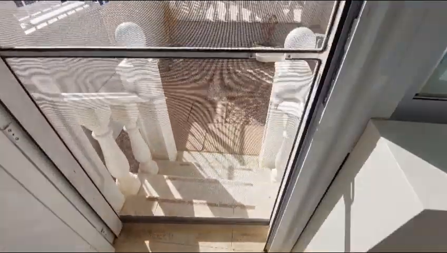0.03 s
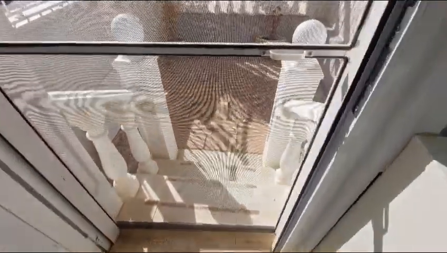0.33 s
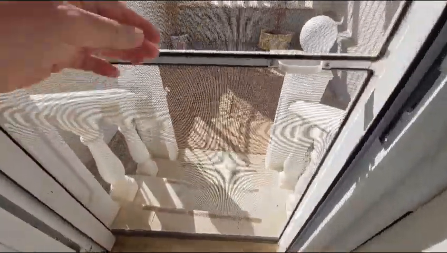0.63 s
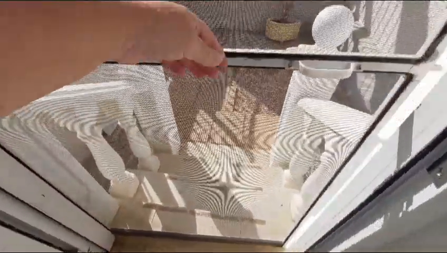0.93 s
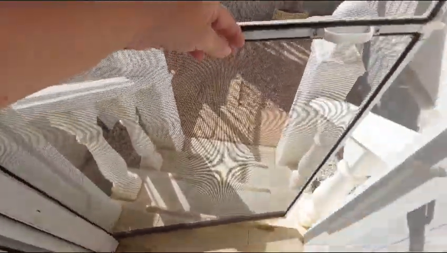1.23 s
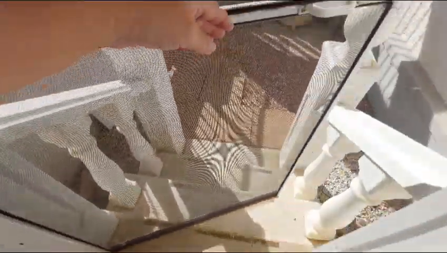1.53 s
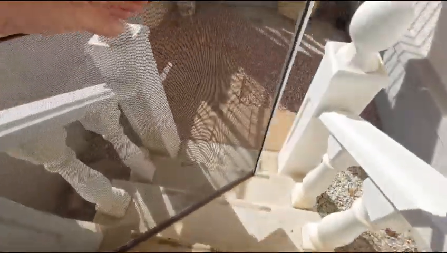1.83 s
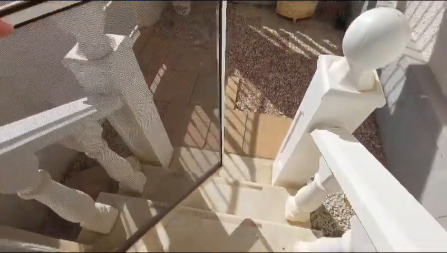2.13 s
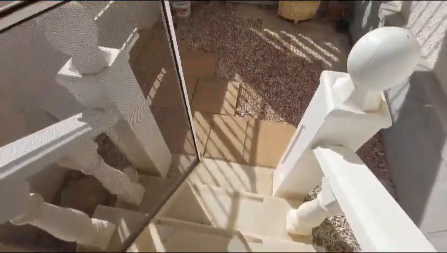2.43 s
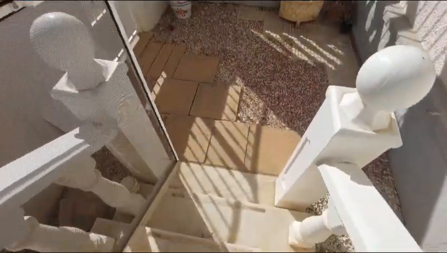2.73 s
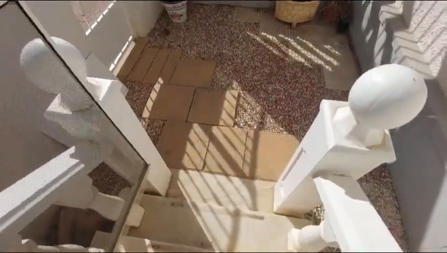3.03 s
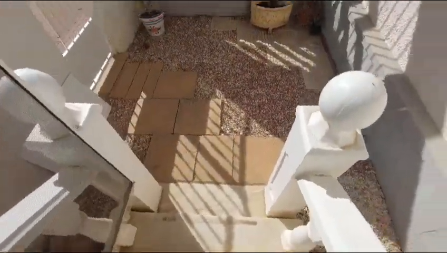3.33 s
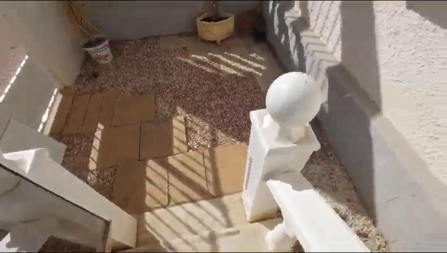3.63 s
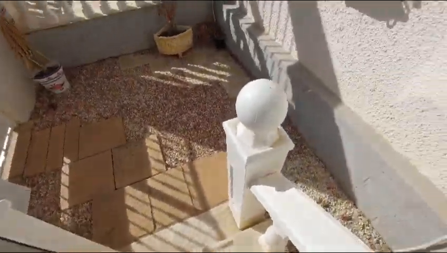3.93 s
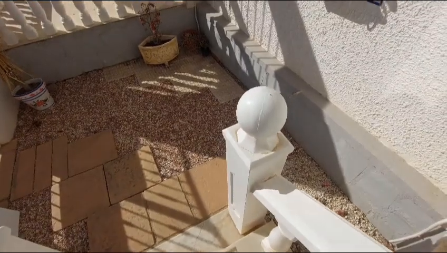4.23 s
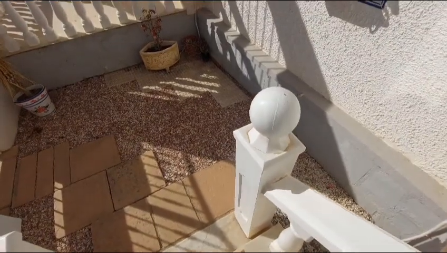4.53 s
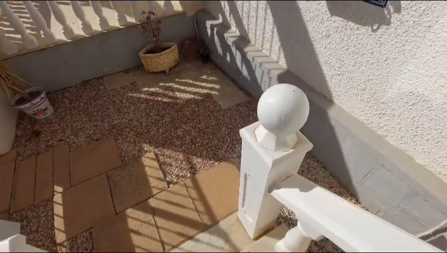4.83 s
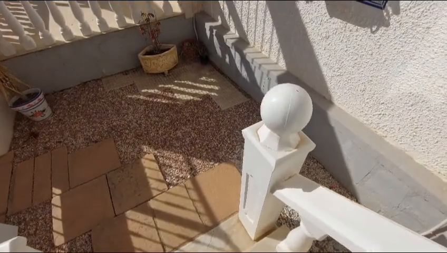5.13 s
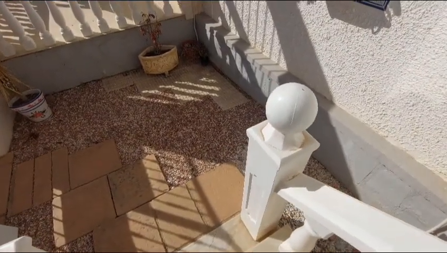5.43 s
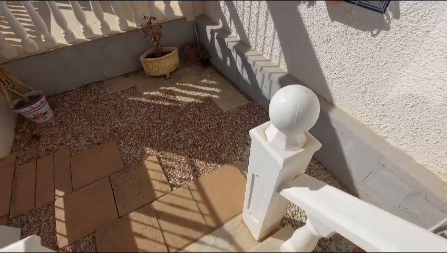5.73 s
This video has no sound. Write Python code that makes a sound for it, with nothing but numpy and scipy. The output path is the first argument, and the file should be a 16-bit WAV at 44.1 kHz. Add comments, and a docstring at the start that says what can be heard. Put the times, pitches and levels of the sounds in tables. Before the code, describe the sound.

A metal screen door rattles open, squeaks and bangs against its stop, followed by heavy footsteps on outdoor steps.

```python
"""A metal screen door is pushed out of its frame, squeaks open and bangs against its stop.
Each blow makes the door rattle and ring, and a hallway echoes it; the hinge squeaks as it grips and slips.
Gusts buffet the microphones in the doorway, a hand slides on the door and clothes brush.
Then heavy footfalls boom on the steps between hard walls.
The hush of the house fades into a quiet yard with far birds."""
import sys
import numpy as np
from scipy import signal
from scipy.fft import rfft, irfft
from scipy.io import wavfile
from scipy.ndimage import uniform_filter1d

SR = 44100
rng = np.random.default_rng(int(sys.argv[2]) if len(sys.argv) > 2 else 0)


def dump(signal):
    """Clip the signal to [-1, 1] and save it as 16-bit WAV at the path in sys.argv[1]."""
    limited = np.clip(np.atleast_2d(signal).T, -1, 1)
    pcm = np.round(limited * 32767).astype(np.int16)
    wavfile.write(sys.argv[1], SR, pcm)


N = 264600
TIME = np.arange(N) / SR
TOP_HZ = 16000

# A colour says how strong a sound is from bass to treble. For each: f/Hz, level/dB
HOUSE_COLOUR = [(24, -36.5), (40, -10), (60, -12), (200, -6.5), (300, -1), (455, -2.5), (600, 4),
                (1270, 3.5), (2000, -0.5), (3300, -11.5), (4930, -5), (9000, -19.5), (16000, -22.5)]
YARD_COLOUR = [(15, -35), (25, -17), (59, 2.5), (123, -2.5), (180, -10.5), (242, -9.5), (373, -20),
               (607, -16.5), (936, -28.5), (2910, -31.5), (4200, -25.5), (6000, -33.5), (16000, -41.5)]
WIND_COLOUR = [(20, -35.5), (45, -4), (75, 3), (110, -2), (170, -15.5), (260, -22.5), (400, -34.5),
               (1000, -51), (8000, -54)]
BUFFET_COLOUR = [(50, -32), (110, -4.5), (170, -0.5), (260, -11), (450, -34), (1500, -70), (8000, -80)]
RUB_COLOUR = [(530, -43), (900, -23.5), (1600, -13), (1850, -4), (2700, -4.5), (4300, -6), (5500, -14),
              (8250, -6.5), (11600, -7), (16000, -7.5)]
JUDDER_COLOUR = [(35, -51), (60, -16), (176, -14.5), (301, -7), (360, -11.5), (570, -14.5), (1090, -14),
                 (1620, -14), (2900, -17.5), (3760, -24.5), (7000, -27.5), (11000, -38.5), (16000, -41)]
KNOCK_COLOUR = [(100, -23.5), (250, 9), (500, -0.5), (750, -12), (1300, -16), (2200, -34.5), (8000, -43.5),
                (16000, -53)]
BANG_COLOUR = [(29, -50.5), (65, -26), (114, -7), (160, -12.5), (277, -5), (389, -13), (661, -14),
               (927, -15), (1120, -11.5), (2010, -13.5), (3000, -13.5), (5400, -20.5), (7200, -19.5),
               (10500, -26.5), (16000, -33.5)]
CLOTHES_COLOUR = [(200, 5.5), (600, 5), (1200, -0.5), (2300, 5.5), (3300, 0.5), (5000, -0.5), (6500, -11),
                  (9000, -12), (16000, -22)]
STEP_COLOUR = [(29, -51), (50, -31.5), (114, 0), (260, -3.5), (398, -13), (900, -17), (1100, -21),
               (2200, -29), (3300, -34.5), (5500, -48.5), (7500, -53.5), (10500, -57.5), (16000, -61)]
MIC_COLOUR = [(7500, -0.5), (9700, -4.5), (11500, 1), (13500, 3.5), (15500, 0), (16200, 2.5)]  # a dip in the treble, then a lift from the microphones' openings

# gusts on the microphones: t/s, length/s, level/dB, left minus right/dB
GUSTS = [(-.02, 0.039, -42.5, 1), (0.042, 0.033, -50.5, 19), (1.317, 0.099, -38, -28),
         (1.434, 0.063, -32, -22), (1.558, 0.023, -38, -31), (1.624, 0.064, -35.5, -7),
         (1.737, 0.068, -37, -10), (1.861, 0.22, -45.5, -9), (2.068, 0.057, -48.5, -6),
         (2.583, 0.31, -49, -17), (3.029, 0.081, -52.5, -11)]
# rubbing movements: t/s, length/s, level/dB
HAND_SLIDES = [(.23, 0.18, -59.5), (.515, 0.022, -51.5), (.66, 0.1, -61), (1.215, 0.029, -49.5),
               (1.96, 0.032, -55.5), (2.11, .06, -64.5), (2.25, 0.32, -75.5)]
CLOTHES_BRUSHES = [(3.55, 0.11, -63), (3.715, .035, -57), (3.79, 0.023, -56.5), (3.89, 0.18, -59.5),
                   (4.33, .03, -77.5), (4.5, 0.085, -71), (4.628, .035, -67), (5.36, 0.052, -75),
                   (5.96, .04, -62.5)]
# clicks of fittings and heels: t/s, starting level/dB, centre f/Hz, width/octaves, time to fade 60 dB/s
TICKS = [(0.541, -47.5, 6130, 2.1, 0.18), (1.251, -47, 9000, 1.4, .03), (1.34, -40.5, 10700, 0.13, .012),
         (2.683, -53, 8100, 0.71, 0.019), (3.225, -17, 12000, 3.7, .005),
         (3.582, -24.5, 5240, 0.88, 0.0071), (3.585, -44.5, 7740, 0.9, 0.088),
         (3.355, -54, 13000, 0.46, .07), (3.408, -51, 13000, 0.77, .07), (4.806, -50.5, 14100, 0.69, 0.083),
         (4.895, -52, 12000, 1.3, 0.089), (5.606, -54, 12950, 1.4, .06)]
# far bird calls: t/s, length/s, start f/Hz, end f/Hz, level/dB
BIRD_CALLS = [(0.833, 0.15, 5900, 6200, -60), (0.939, 0.091, 4700, 4300, -56),
              (1.166, 0.21, 5780, 5830, -52), (1.214, 0.073, 4490, 4890, -47.5),
              (1.311, 0.14, 3890, 4570, -51), (1.902, .22, 5480, 4820, -61),
              (2.372, .12, 4270, 3640, -67.5), (2.652, 0.171, 3580, 3710, -70.5),
              (2.799, .32, 4230, 3990, -70.5), (3.999, 0.27, 617, 583, -70),
              (5.962, 0.053, 4460, 6620, -61.5)]
# slips of frame and hinge: t/s, length/s, level/dB, start f/Hz, share of tone (0-1), overtone boost/dB
SQUEAKS = [(1.044, .052, -36.5, 2864, .98, -15.5), (1.39, 0.062, -43, 1885, 0.2, -1),
           (1.44, 0.062, -43, 2340, .3, -2), (1.498, 0.02, -45.5, 2850, 0.7, 0),
           (1.668, 0.052, -43.5, 1820, 0.7, -8.5), (1.713, 0.06, -41.5, 2426, 0.74, -4),
           (1.762, 0.041, -41, 2754, 0.9, 3.5), (1.795, 0.036, -42.5, 2960, 0.84, -0.5)]

# blows: t/s, level/dB, brightness/(dB per octave), swell time/s, ringing/dB, spot struck (0-1)
JUDDERS = [(1.053, -22.5, -1.5, 0.015, -1.5, 0.18), (1.077, -25.5, -1, 0.0024, 4, 0),
           (1.090, -21, -1, .002, -5.5, 0.14), (1.102, -19.5, 0.57, .004, 3.5, 0.01)]  # the door drags out of its frame
KNOCKS = [(2.376, -45.5, 1.5, 0.0044, -26.5, 0.23), (2.412, -47.5, 2.5, 0.00036, -22.5, 0.1),
          (2.452, -57.5, 4, 0.0032, -5.5, 0.3)]  # light knocks underfoot
BANGS = [(3.226, -27, 0.4, 0.0012, 2, 0.8), (3.231, -16, 0, 0.0024, -2.5, 1),
         (3.245, -20.5, -3.5, 0.0017, 4, 0.7), (3.357, -22.5, -8, 0.0037, -17, 0.8),
         (3.392, -28.5, -5, 0.0018, -15, 0.1), (3.406, -57, 6, 0.0024, -16.5, 0.8),
         (3.505, -42, -2, 0.0056, -17, 1)]  # the door hits its stop and bounces
STEPS = [(4.805, -29, 3, 0.03, 0.5, 0.69), (4.894, -27.5, 1.4, 0.014, 0, 0.75),
         (4.983, -34, 0.3, 0.0008, -6.5, 0), (5.105, -38, -24, 0.016, -28, 0.8),
         (5.607, -27.5, 2.5, 0.02, -4.5, 0.99)]  # heel and sole land
# the notes a struck thing rings with: f/Hz, time to fade 60 dB/s, level at spot 0/dB, at spot 1/dB
DOOR_NOTES = [(119, 1, -33.5, -25), (286, 0.75, -17.5, -20.5), (313.8, 0.67, -16.5, -23.5),
              (417.5, 0.45, -11, -31.5), (559, 0.74, -37, -23.5), (588, 0.25, -6.5, -29),
              (666.4, 0.51, -15, -32.5), (770, 0.48, -12, -22), (857, 0.59, -17, -23.5),
              (915, 0.14, -19.5, -4), (1004, 0.18, -16.5, -23.5), (1189, .25, -11, -29.5),
              (1300, .25, -17, -28), (1948, .65, -18, -21), (2620, 0.4, -27.5, -23), (2530, 0.15, -37, -20),
              (2841, 0.16, -29.5, -19.5), (2980, .15, -31.5, -20), (3795, 0.32, -36, -26.5),
              (4334, 0.29, -44, -23.5), (6700, .14, -34, -20), (7246, 0.15, -36.5, -25.5)]  # spot 0 is the door's edge, spot 1 is where it meets the stop
STEP_NOTES = [(138.4, 0.94, -19, -18), (160, 0.19, -10, -24), (227, 0.52, -8, -32), (278.3, 0.48, 0.5, -11),
              (287, 0.98, -11.5, -26), (726, 0.633, -48, -14.5), (803, 0.31, -24.5, -7),
              (924, 0.16, -2.5, -8.5), (1277, 0.2, -14.5, -15.5), (1570, 0.077, -9.5, -3.5),
              (2220, 0.11, -23.5, -3.5), (2460, 0.071, -67, -2)]  # spot 0 is the upper step, spot 1 the lower
# how long door, steps and walls keep sounding: f/Hz, time to fade 60 dB/s
JUDDER_DECAY = [(100, 1), (300, 0.67), (800, 0.53), (2000, 0.21), (6000, 0.18), (14000, 0.11)]
HALL_DECAY = [(150, 1), (1000, 0.32), (4000, 0.82), (14000, 0.29)]
KNOCK_DECAY = [(200, 0.11), (1500, 0.089), (8000, 0.45)]
BANG_DECAY = [(100, 1), (300, 0.55), (800, 0.48), (2000, 0.29), (6000, 0.18), (14000, 0.22)]
STEP_DECAY = [(100, 0.93), (300, 0.52), (800, 0.32), (2000, 0.24), (6000, 0.19), (14000, 0.19)]
# how alike the two microphones hear sound from all around: f/Hz, likeness (1 = the same)
LIKENESS = [(40, 0.69), (120, 0.41), (290, .78), (500, 0.43), (800, -.1), (1300, -0.15), (2400, -0.13),
            (5000, -0.094), (15000, 1)]


def amp(db):
    """Turns decibels into a gain."""
    return 10 ** (np.asarray(db) / 20)


def unit(x):
    """Scales a signal to an average strength (rms) of 1."""
    return x / np.sqrt(np.mean(x ** 2) + 1e-20)


def read(points, hz):
    """Looks up a frequency in a table, blending between rows on a pitch scale."""
    f, value = np.transpose(points)
    return np.interp(np.log(hz + 1), np.log(f + 1), value)


def add(mix, s, sound):
    """Mixes a stereo sound in at s seconds."""
    part = mix[:, max(round(s * SR), 0):][:, :sound.shape[1]]
    part += sound[:, :part.shape[1]]


def noise(colour, size, tilt_db=0, all_around=True):
    """Coloured stereo noise: partly alike left and right if it comes from all around, else unrelated."""
    hz = np.fft.rfftfreq(size, 1 / SR)
    a, b = rng.standard_normal((2, len(hz))) + 1j * rng.standard_normal((2, len(hz)))
    alike = read(LIKENESS, hz) * all_around
    mid, side = a * np.sqrt(1 + alike), b * np.sqrt(1 - alike)
    octaves = np.log2((hz + 50) / 1000)
    gain = amp(read(colour, hz) + tilt_db * octaves)
    return unit(irfft(np.array([mid + side, mid - side]) * gain, size))


def wander(size, per_s):
    """A random curve of strength about 1 that turns per_s times a second."""
    points = rng.standard_normal(size)
    return np.interp(np.arange(size) * per_s / SR, np.arange(size), points) * np.sqrt(3 / 2)


def fuzzy(angle, blur_hz):
    """A stereo tone that flutters at random, which blurs its pitch."""
    size = len(angle)
    return np.array([wander(size, blur_hz) * np.cos(angle) + wander(size, blur_hz) * np.sin(angle)
                     for side in "LR"])


def stroke(s, length, rise_s, fall_db_per_s):
    """The gain of one movement: it swells, holds and dies away."""
    swell = np.sin(np.pi / 2 * np.clip((TIME - s) / rise_s, 0, 1)) ** 2
    return swell * amp(-fall_db_per_s * np.maximum(TIME - s - length, 0))


def strokes(rows, rise_s, fall_db_per_s):
    """The gain of a series of movements."""
    power = sum((amp(db) * stroke(s, length, rise_s, fall_db_per_s)) ** 2 for s, length, db in rows)
    return np.sqrt(power)


def die_away(x, decay, bass_lag_s=0.):
    """Fades each frequency at its own speed; the bass can build up late."""
    hz, t, bands = signal.stft(x, SR, nperseg=256)
    fade_s = read(decay, hz)[:, None]
    fade = amp(-60 * t / fade_s) * np.sqrt(fade_s.mean() / fade_s)  # shorter fades start louder
    lag_s = 1e-5 + bass_lag_s / (1 + (hz[:, None] / 400) ** 2)
    build_up = 1 - np.exp(-(t + 1e-3) / lag_s)
    return signal.istft(bands * fade * build_up, SR, nperseg=256)[1][:, :x.shape[1]]


def blows(rows, colour, decay, notes, rattle_db, bass_lag_s, ripple_db):
    """Each blow sets off a fading rattle and the clear notes of the thing struck."""
    out, t = np.zeros((2, N)), np.arange(SR) / SR
    # crowded high notes make the colour uneven, in the same way for every blow
    grid_hz = np.r_[np.geomspace(20, 1000, 60), np.arange(1070, 17000, 70)]
    treble = np.clip(grid_hz / 1000 - 1, 0, 1)
    ripple = ripple_db * np.clip(rng.standard_normal(len(grid_hz)), -2, 1) * treble
    colour = np.transpose([grid_hz, read(colour, grid_hz) + ripple])
    hz, fade_s, db_0, db_1 = np.transpose(notes)
    tones = np.exp(np.outer(2j * np.pi * hz - np.log(1000) / fade_s, t))
    # each note reaches the two microphones out of step
    apart = np.arccos(read(LIKENESS, hz)) * rng.choice([-1, 1], len(hz)) / 2
    pair = np.sqrt(2) * np.exp(1j * np.outer([1, -1], apart))
    for s, db, tilt_db, swell_s, ring_db, spot in rows:
        note_gains = amp(ring_db + db_0 + spot * (db_1 - db_0))
        ring = ((pair * note_gains) @ tones).imag
        rattle = die_away(noise(colour, SR, tilt_db), decay, bass_lag_s)
        rattle *= amp(rattle_db * wander(SR, 350))
        swell = 1 - np.exp(-t / swell_s)
        add(out, s, amp(db) * swell * (rattle + ring))
    return out


def house(doorway_s=1.996, crossing_s=0.14, drop_db=22, fade_db_per_s=7):
    """The indoor hush drops as the microphones pass the doorway, then fades with distance."""
    outside = 1 / (1 + np.exp((doorway_s - TIME) / crossing_s))
    distance_db = fade_db_per_s * np.maximum(TIME - doorway_s, 0)
    return amp(-52.5 - drop_db * outside - distance_db) * noise(HOUSE_COLOUR, N)


def yard():
    """A faint outdoor rumble that wavers a little."""
    return amp(-64 + 0.71 * wander(N, 9)) * noise(YARD_COLOUR, N)


def wind():
    """Swirls of air rumble on each microphone separately; strong gusts buffet at a higher pitch too."""
    power = np.zeros((2, N))
    swirls = noise(WIND_COLOUR, N, all_around=False)
    swirls /= np.sqrt(uniform_filter1d(swirls ** 2, 3000) + 1e-6)  # evens out their strength
    for s, length, db, pan_db in GUSTS:
        sides = amp([[pan_db / 2], [-pan_db / 2]])
        gust = amp(db) * stroke(s, length, rise_s=0.024, fall_db_per_s=229.5)
        power += (gust * 2 * sides / np.linalg.norm(sides)) ** 2
    buffet = amp(15.5) * power * noise(BUFFET_COLOUR, N, all_around=False)
    lumps = amp(2.5 * wander(N, 25))
    return (np.sqrt(power) * swirls + buffet) * lumps


def hand():
    """A hand slides on the door with a grainy hiss."""
    level = strokes(HAND_SLIDES, rise_s=0.024, fall_db_per_s=185.5)
    return level * noise(RUB_COLOUR, N, tilt_db=-3.2) * amp(1.1 * wander(N, 180))


def ticks():
    """Door fittings and hard heels click: short, bright bursts of noise."""
    out, t = np.zeros((2, N)), np.arange(8192) / SR
    hz = np.fft.rfftfreq(len(t), 1 / SR)
    for s, db, centre_hz, octaves, fade_s in TICKS:
        fade = amp(-60 * t / fade_s)
        burst = np.roll(rng.standard_normal((2, len(t))) * fade, 32, axis=1)
        band = amp(-3 * (np.log2((hz + 1) / centre_hz) / octaves) ** 2)
        snap = unit(irfft(rfft(burst) * band))
        add(out, s, amp(db) * snap * np.sqrt(np.mean(fade ** 2)))
    return out


def birds(blur_share=.19):
    """Thin gliding calls and one low coo, smeared by distance and walls."""
    out = np.zeros((2, N))
    for s, length, start_hz, end_hz, db in BIRD_CALLS:
        hz = np.linspace(start_hz, end_hz, int(length * SR))
        call = fuzzy(2 * np.pi * np.cumsum(hz) / SR, blur_share * start_hz)
        add(out, s, amp(db) * np.sqrt(np.hanning(len(hz))) * call)
    return out


def hinge(jitter=.024, climb_octaves_per_s=1.6):
    """Slips step up in pitch as the door swings faster: a rough squeal in the hiss of dry rubbing."""
    out, t = np.zeros((2, N)), np.arange(SR // 4) / SR
    for s, length, db, start_hz, tone, overtone_db in SQUEAKS:
        hz = start_hz * 2 ** (climb_octaves_per_s * t)
        level = amp(db) * stroke(0, length, rise_s=0.023, fall_db_per_s=652)[:len(t)]
        angle = 2 * np.pi * np.cumsum(hz * (1 + jitter * wander(len(t), 900))) / SR
        squeal = np.zeros((2, len(t)))
        for k in range(1, 9):  # the main tone and its overtones
            gain = amp(read(RUB_COLOUR, k * hz) + overtone_db * (k > 1)) * (k * hz < TOP_HZ)
            squeal += gain * fuzzy(k * angle, blur_hz=315)
        squeal *= amp(2.4 * wander(len(t), 180))  # the grip catches and lets go
        rub = noise(RUB_COLOUR, len(t)) * amp(wander(len(t), 390))
        add(out, s, level * (np.sqrt(tone) * unit(squeal) + np.sqrt(1 - tone) * unit(rub)))
    return out * amp([[-1.3], [1.3]])  # a little to the right


def door():
    """The metal door judders free of its frame and later hits its stop, ringing both times."""
    push = blows(JUDDERS, JUDDER_COLOUR, JUDDER_DECAY, DOOR_NOTES,
                 rattle_db=2.38, bass_lag_s=0.0058, ripple_db=5)
    bang = blows(BANGS, BANG_COLOUR, BANG_DECAY, DOOR_NOTES,
                 rattle_db=1.0, bass_lag_s=0.027, ripple_db=3.5)
    return push * amp([[-.8], [.8]]) + bang * amp([[-.2], [.2]])


def hall(x):
    """The tiled hallway echoes through the open door."""
    echo = die_away(noise([(100, 0), (16000, 0)], SR), HALL_DECAY)
    echo[:, :600] = 0  # the nearest wall is a couple of metres away
    return signal.fftconvolve(x, echo / np.linalg.norm(echo[0]), axes=1)[:, :N]


def feet():
    """Feet shuffle lightly, then land hard and make the steps boom."""
    heavy = blows(STEPS, STEP_COLOUR, STEP_DECAY, STEP_NOTES,
                  rattle_db=1.57, bass_lag_s=0.031, ripple_db=3.5)
    light = blows(KNOCKS, KNOCK_COLOUR, KNOCK_DECAY, STEP_NOTES,
                  rattle_db=-1.5, bass_lag_s=0.00089, ripple_db=3.0)
    return heavy * amp([[-.6], [.6]]) + light


def clothes():
    """Cloth brushes on cloth as the body moves."""
    level = strokes(CLOTHES_BRUSHES, rise_s=0.015, fall_db_per_s=135)
    return level * noise(CLOTHES_COLOUR, N) * amp(1.15 * wander(N, 130))


def scene():
    """All the sounds at the two microphones; only door and hinge echo in the hallway."""
    swing = door() + hinge()
    echo = amp(-17.5) * hall(swing)
    return swing + echo + ticks() + feet() + wind() + birds() + house() + yard() + clothes() + hand()


def record(dry):
    """The microphones colour the treble, and everything above TOP_HZ is cut away."""
    coloured = irfft(rfft(dry) * amp(read(MIC_COLOUR, np.fft.rfftfreq(N, 1 / SR))), N)
    low_pass = signal.firwin(401, TOP_HZ, window=("kaiser", 8), fs=SR)
    return signal.oaconvolve(coloured, low_pass[None], "same", axes=1)


dry = scene()
out = record(dry)
dump(out)
```